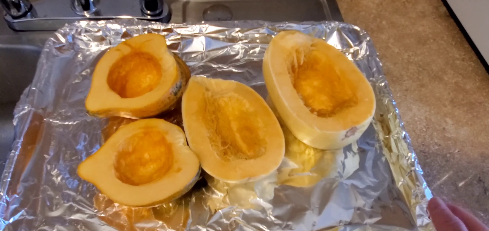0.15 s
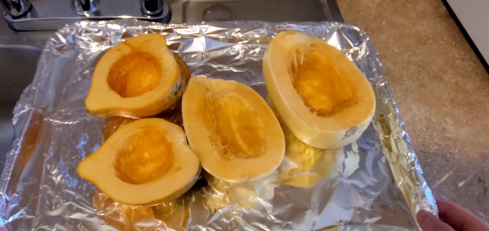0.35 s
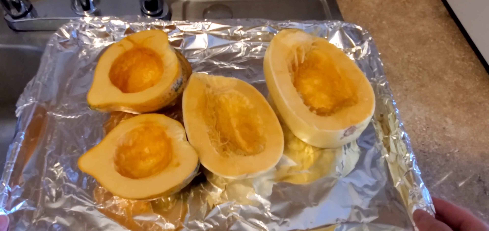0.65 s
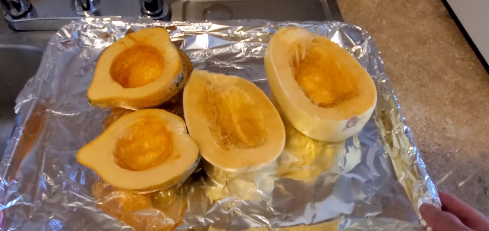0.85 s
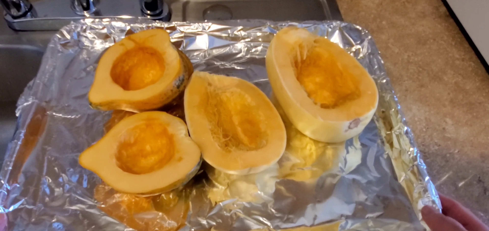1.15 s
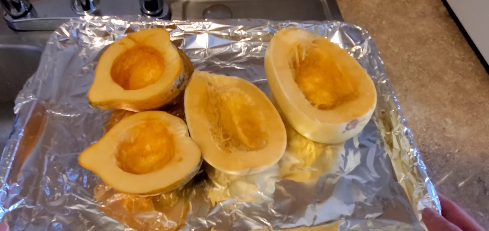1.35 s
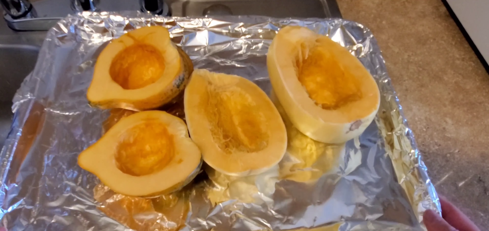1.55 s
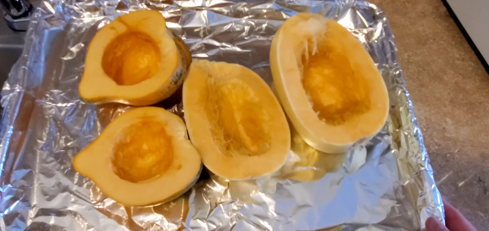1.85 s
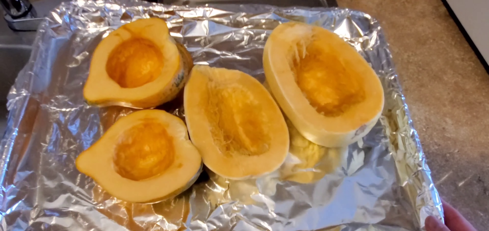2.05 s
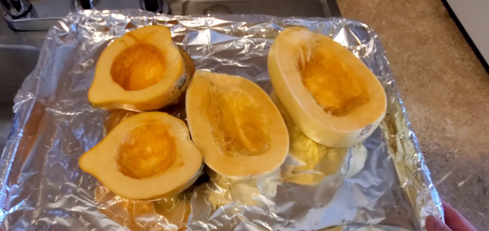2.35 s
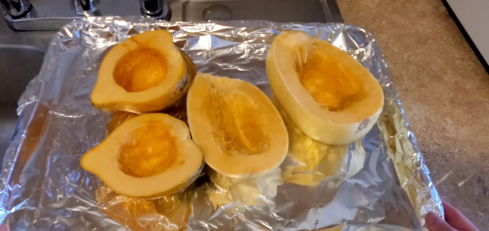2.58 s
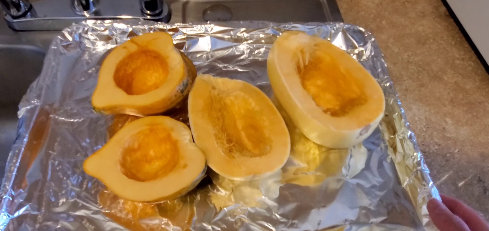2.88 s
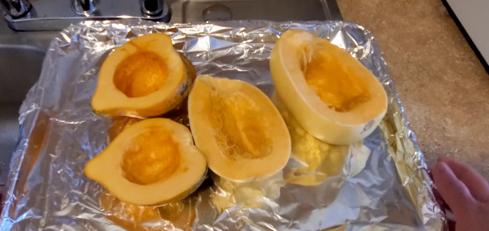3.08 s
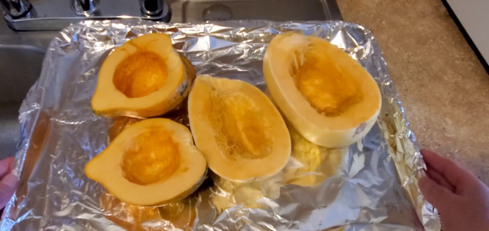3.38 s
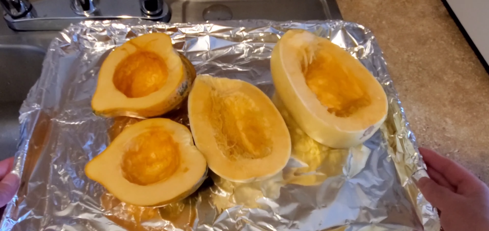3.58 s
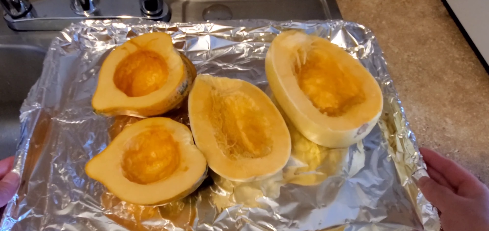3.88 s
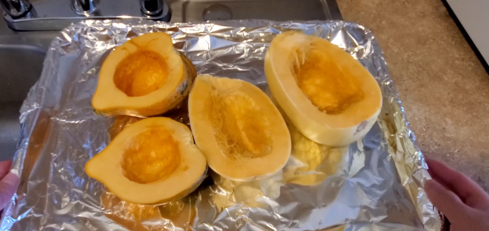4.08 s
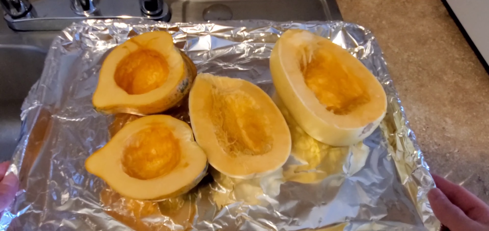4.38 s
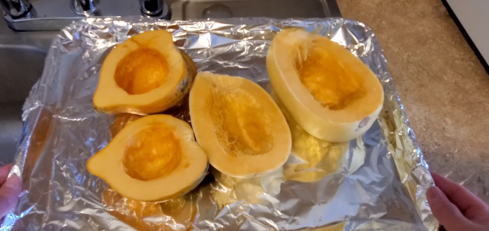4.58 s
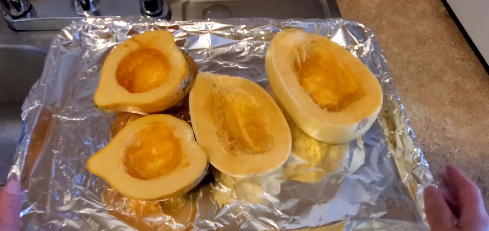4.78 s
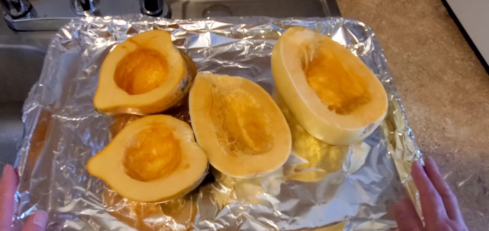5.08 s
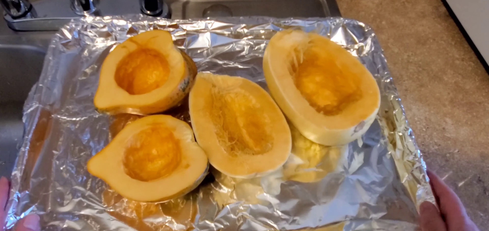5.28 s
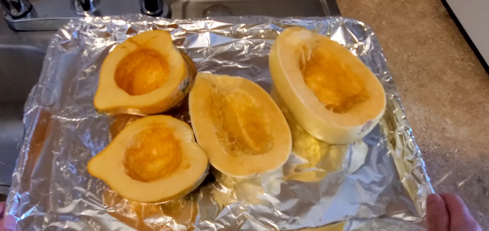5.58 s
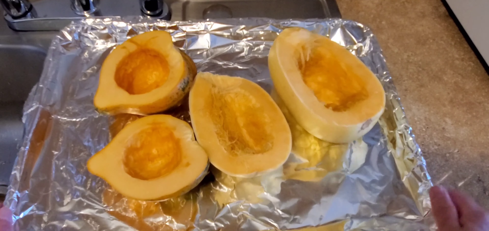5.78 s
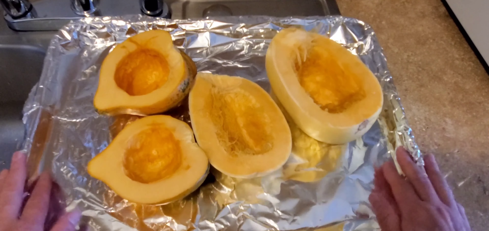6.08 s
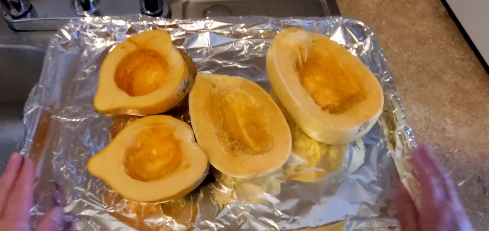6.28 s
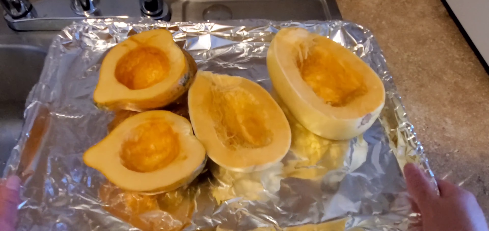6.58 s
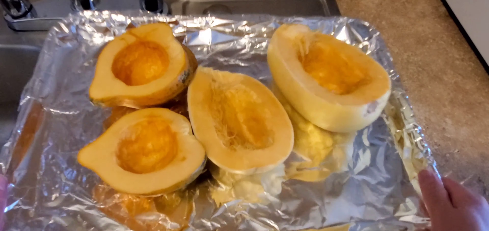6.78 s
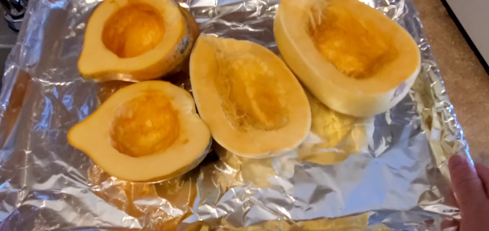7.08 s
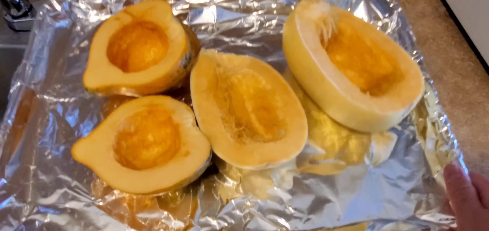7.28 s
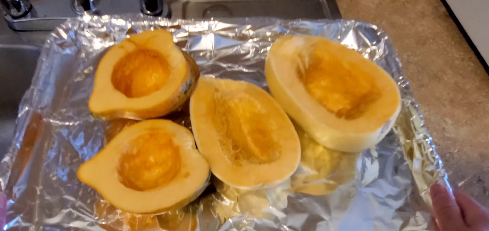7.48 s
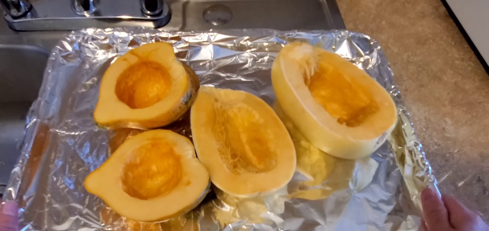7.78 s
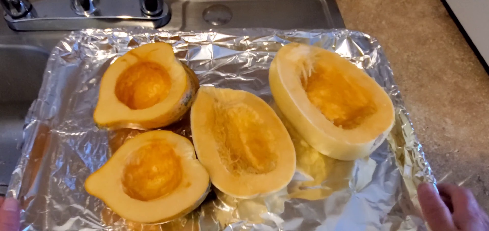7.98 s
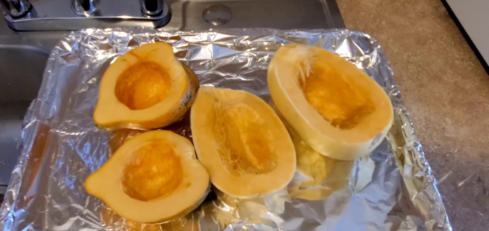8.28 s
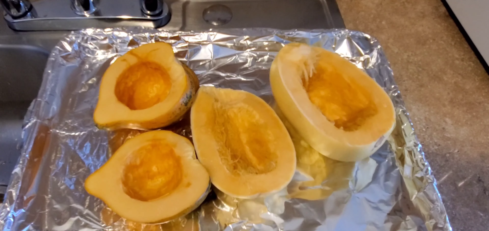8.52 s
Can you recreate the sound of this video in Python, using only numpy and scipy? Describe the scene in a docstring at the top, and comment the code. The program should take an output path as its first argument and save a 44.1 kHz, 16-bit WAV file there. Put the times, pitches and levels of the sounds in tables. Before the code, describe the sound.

Close stereo sound of foil being pressed onto a tray rim: sharp little snaps, dry crinkles and faint patter, shifting slightly between left and right. Low finger rumbles and soft thuds lie beneath. After a dense burst around 6 seconds the tray judders along the counter and knocks. A faint thin whine and tiny squeak close it, with low kitchen hum throughout.

```python
"""Two hands pinch aluminium foil around the rim of a baking tray of squash halves, in a small kitchen.
An appliance hums throughout as filtered noise; sliding fingers rumble low resonances of the tray.
Rustle is a patter of tiny snaps; each pinch is a dying avalanche of snaps, coloured by ringing facets.
The tray knocks the counter now and again as decaying modes and noise; a few facets ping; the tray drags.
Near the end a thin sine whine swells and a soft squeak of narrow noise glides."""
import sys
import numpy as np
from scipy import signal
from scipy.fft import rfft, irfft
from scipy.io import wavfile
from scipy.ndimage import uniform_filter1d

SR = 44100
rng = np.random.default_rng(int(sys.argv[2]) if len(sys.argv) > 2 else 0)


def int16_out(signal):
    """Quantize to a 16-bit WAV file."""
    q = np.round(np.clip(np.atleast_2d(signal).T, -1, 1) * 32767)
    wavfile.write(sys.argv[1], SR, q.astype(np.int16))


N = 381465
TIME = np.arange(N) / SR


def from_db(db):
    """Decibels to amplitude gain."""
    return 10 ** (np.asarray(db) / 20)


def rms_one(x):
    """Scale to unit power."""
    return x / np.sqrt(np.mean(x ** 2) + 1e-20)


def in_time(rows):
    """Interpolate each column of a time table at every sample."""
    s, *columns = np.transpose(rows)
    return [np.interp(TIME, s, column) for column in columns]


def at_hz(points, hz):
    """Read a table on a log-frequency axis."""
    f, value = np.transpose(points)
    return np.interp(np.log(np.maximum(hz, 1)), np.log(f), value)


def cut(x, hz, kind, order=2):
    """Butterworth filter."""
    sos = signal.butter(order, hz, kind, fs=SR, output="sos")
    return signal.sosfilt(sos, x + 1e-18)


def add(track, s, sound):
    """Mix a sound into a track at time s."""
    at = int(s * SR)
    track[..., at:at + sound.shape[-1]] += sound[..., :N - at]


def coloured(x, spectrum, size=4096):
    """Causal (minimum-phase) filter with the given spectrum shape and unit power gain."""
    bins_hz = np.arange(size // 2 + 1) * SR / size
    cepstrum = irfft(np.log(from_db(at_hz(spectrum, bins_hz))))
    response = irfft(np.exp(rfft(2 * cepstrum[:size // 2], size)))
    response = response / np.linalg.norm(response)
    return signal.fftconvolve(x, [response], axes=-1)[:, :N]


def stereo_noise(count, alike):
    """Two white noises sharing the fraction alike of their power."""
    shared, *own = rng.standard_normal((3, count))
    return np.sqrt(alike) * shared + np.sqrt(1 - alike) * np.array(own)


def narrow_noise(hz, width_hz):
    """A resonance, steady or moving, kept ringing by friction: unit-power noise around hz."""
    re, im = cut(rng.standard_normal((2, N)), width_hz / 2, "low")
    carrier = np.exp(2j * np.pi * np.cumsum(hz * np.ones(N)) / SR)
    return rms_one(np.real((re + 1j * im) * carrier))


def snaps(count, per_s, spread_db):
    """Energies of creases that flip at random moments, most small and a few large."""
    chance, size = rng.random((2, count))
    amplitude = from_db(-spread_db * np.log(np.maximum(size, .02)))
    return (chance < per_s / SR) * amplitude ** 2


def ring_down(energy, t60):
    """Stored energy leaks away exponentially, by 60 dB in t60 seconds."""
    keep = from_db(-120 / (t60 * SR))  # energy, so twice 60 dB on the amplitude scale
    return signal.lfilter([1 - keep], [1, -keep], energy + 1e-18)


def gestures(rows, attack_s, t60):
    """Gain of a run of hand movements: each swells up to its start, holds for its length and dies away."""
    power = 0
    for s, length_s, level_db in rows:
        swell = np.exp(np.minimum(TIME - s, 0) / (attack_s / 2))
        release_db = -60 * np.clip((TIME - s - length_s) / t60, 0, 2)
        power = power + (swell * from_db(level_db + release_db)) ** 2
    return np.sqrt(power)


# Hand at work. Each row: start in seconds, hand (0 left, 1 right).
HAND_TURNS = [(0, 0), (.48, 1), (1, 0), (4.97, 1), (8, 0)]


def hand_at(s):
    """The hand at work at time s."""
    start_s, hand = np.transpose(HAND_TURNS)
    return hand[np.searchsorted(start_s, s, side="right") - 1].astype(int)


# Place of each hand. Each row: left-over-right level in dB, lag of the left microphone in seconds.
HAND_PLACES = [(6.0, -.00026), (2.8, .00012)]


def placed(energy, hand, alike):
    """The foil's countless modes ring as noise under an energy envelope; level and lag place the hand."""
    pan_db, lag_s = HAND_PLACES[hand]
    pair = np.sqrt(np.maximum(energy, 0)) * stereo_noise(len(energy), alike)
    pair = pair * from_db([[pan_db / 2], [-pan_db / 2]])
    delays = max(round(lag_s * SR), 0), max(round(-lag_s * SR), 0)
    return np.array([np.pad(side, (delay, 0))[:len(energy)] for side, delay in zip(pair, delays)])


# Appliance noise spectrum. Each row: frequency in Hz, relative density in dB per Hz.
HUM_SPECTRUM = [(20, -13.5), (40, -2), (70, 6), (130, -2.5), (220, -3), (320, 0.5), (440, -7), (560, -7.5),
                (900, -14.5), (2000, -22.5), (5000, -43), (16000, -39)]
# Appliance lines. Each row: frequency in Hz, RMS level in dB.
HUM_LINE_LEVELS = [(80, -66), (440, -66)]


def hum(level_db=-54.5, diffuse_hz=500):
    """Appliance rumble, alike on both sides in the bass and diffuse above, with two wavering lines."""
    bass = cut(stereo_noise(N, alike=0.96), diffuse_hz, "low", order=1)
    diffuse = cut(stereo_noise(N, alike=0.04), diffuse_hz, "high", order=1)
    lines = sum(from_db(db) * narrow_noise(hz, width_hz=6.0) for hz, db in HUM_LINE_LEVELS)
    return from_db(level_db) * coloured(bass + diffuse, HUM_SPECTRUM) + lines


# Hands shifting grip on the tray. Each row: start in seconds, length in seconds, level in dB.
GRIP_SHIFTS = [(0, 0.096, -52.5), (2.95, 0.085, -43), (4.99, .18, -47.5), (6.11, 0.36, -41),
               (8.08, .55, -54)]


def grip():
    """Sliding fingers keep two low resonances of the tray rumbling."""
    low = narrow_noise(84, width_hz=33.0)
    high = from_db(-14.0) * narrow_noise(165, width_hz=23)
    return gestures(GRIP_SHIFTS, attack_s=.04, t60=0.4) * (low + high)


# Fingers pressing the foil down. Each row: start in seconds, length in seconds, relative level in dB.
FINGER_PRESSES = [(.18, 0.071, -45.5), (.3, 0.081, -49), (.45, .02, -41), (.72, 0.013, -49),
                  (.885, 0.032, -45), (1.025, 0.014, -46.5), (1.14, 0.061, -36.5), (1.33, 0.074, -59),
                  (1.785, 0.01, -45), (1.9, 0.13, -60.5), (2.7, .33, -55), (3.08, 0.013, -31),
                  (3.29, 0.059, -57), (3.35, .26, -52), (3.96, .05, -55), (4.015, 0.092, -48),
                  (4.275, 0.062, -45), (4.51, .04, -52), (4.685, 0.028, -41), (4.925, .06, -50),
                  (5.2, 0.35, -51.5), (5.445, 0.087, -49.5), (5.515, 0.097, -36.5), (5.755, 0.065, -47),
                  (6.1, 0.049, -37.5), (6.19, 0.45, -45), (6.44, 0.22, -45.5), (6.87, 0.096, -51),
                  (7.06, 0.064, -49), (7.415, 0.071, -51), (7.66, 0.023, -43.5), (7.805, 0.18, -45.5)]
# Hands resting on the foil, faintly stirring it. Each row: start in seconds, length in seconds,
# relative level in dB.
RESTING_HANDS = [(0.131, 1.32, -58), (2.71, 1.2, -71.5), (4.555, 0.61, -64), (6.098, 3, -70.5)]


def rustle(level_db=-4.0, sparkle_db=-1.0, firm_db=-48.5, brightening_db_per_db=0.1,
           split_hz=6000, rim_hz=2900):
    """Fingers keep up a patter of tiny snaps, brighter the harder they press."""
    fingers = gestures(FINGER_PRESSES + RESTING_HANDS, attack_s=0.029, t60=0.16)
    press_db = 20 * np.log10(np.hypot(fingers, settling()))
    energy = ring_down(snaps(N, per_s=700, spread_db=3.7), t60=.009)
    working = hand_at(TIME)
    both_hands = sum(placed(energy * (working == hand), hand, alike=0.17) for hand in range(2))
    patter = rms_one(both_hands) * from_db(press_db + level_db)
    # the fold over the rim favours one pitch
    patter = patter + 0.54 * signal.lfilter(*signal.iirpeak(rim_hz, 4, fs=SR), patter)
    dull = cut(patter, split_hz, "low", order=3)
    bright = cut(patter, split_hz, "high", order=3)
    return dull + bright * from_db(sparkle_db + brightening_db_per_db * (press_db - firm_db))


# Foil crinkles. Each row: start in seconds, relative peak in dB, body gain in dB, sparkle gain in dB,
# length of the burst in seconds.
FOIL_CRINKLES = [(0.261, -29.5, 6.5, 2, 0.0027), (.4225, -23, -1, 1, 0.009), (.502, -30, 7.5, 3, .012),
                 (.541, -28.5, -3, 4.5, .007), (0.757, -31, 1, 3, 0.013), (.778, -25.5, 0.5, -10, 0.006),
                 (.909, -34, -15, 8, 0.0045), (.967, -51, -3, 13, 0.0065), (1.117, -25.5, -6, 0.5, 0.0043),
                 (1.277, -31.5, 1, 5, 0.0092), (1.358, -32.5, -3, -19, 0.0035),
                 (1.557, -23.5, -4, 7.5, 0.0091), (1.664, -40, -3, -2, 0.0096), (1.914, -33.5, 2, 6, .011),
                 (2.504, -36, 11.5, -2, 0.018), (2.729, -31.5, -5, -6, 0.0059), (2.75, -20.5, 7, 0, 0.0069),
                 (2.829, -28.5, 6, 4, 0.0094), (2.937, -36, 7.5, 12, 0.0077), (2.986, -36, 9, 2, 0.012),
                 (3.0637, -22.5, 2.5, -7, 0.014), (3.084, -16.5, -2, -2, 0.0071),
                 (3.351, -31.5, 5.5, -10, 0.004), (3.468, -38, 5, -1, 0.0072),
                 (3.555, -33, 2.5, 6.5, 0.0054), (3.75, -42, 6, 4, 0.0087), (4.079, -26.5, 0, 5, 0.0028),
                 (4.227, -36, -9, -3.5, 0.013), (4.26, -35.5, -9, 5, 0.011), (4.288, -34.5, 6.5, 0, 0.015),
                 (4.343, -34.5, 7, 3, 0.011), (4.554, -30.5, -1, -1, 0.0074), (4.74, -20, 5.5, .5, 0.0072),
                 (4.956, -24.5, -1, -0.5, 0.0094), (4.981, -19.5, 3, -2, .007), (5.179, -37, 5, -2, 0.0055),
                 (5.34, -28, -1, -10, 0.011), (5.521, -27.5, -20, 3.5, 0.026), (5.594, -34, -19, 6, 0.0078),
                 (5.718, -35.5, -4, 5, 0.015), (6.074, -14, 4.5, 0, 0.018), (6.096, -14.5, -10, 4, .012),
                 (6.267, -20, 1.5, 1, 0.0069), (6.425, -27, 9, 2.5, 0.026), (6.452, -24.5, 2.5, 1.5, .005),
                 (6.604, -30.5, 5, 11.5, 0.012), (6.711, -29.5, 3.5, 0, 0.0066), (6.745, -30, 1, 8.5, .018),
                 (6.903, -28, -1, 4.5, 0.0092), (7.08, -30.5, 1.5, -0.5, .005),
                 (7.165, -40.5, 0, -10.5, 0.0064), (7.485, -24, 1.5, 3, 0.0077),
                 (7.644, -29.5, 14, -8, 0.0076), (7.787, -30, -9, 5.5, 0.011), (7.837, -30, 0.5, -7, .007),
                 (7.889, -24, 8.5, -1, 0.0084), (7.954, -26, 6.5, -0.5, 0.0072),
                 (8.006, -39.5, -10, 12, 0.0041), (8.079, -22, 5, -10, 0.0087)]


def settling(under_peak_db=-20.5):
    """Gain of the small creases that go on flipping after each crinkle."""
    rows = [(s + length_s, length_s, peak_db + under_peak_db)
            for s, peak_db, _, _, length_s in FOIL_CRINKLES]
    return gestures(rows, attack_s=.004, t60=0.21)


def crinkles(level_db=-8.5, body_hz=1900, sparkle_hz=7000, first_snap=0.4):
    """One crease sets off a dying avalanche of others; large facets add body, small ones sparkle."""
    body, middle, sparkle = np.zeros((3, 2, N))
    t = np.arange(SR // 6) / SR
    for s, peak_db, body_db, sparkle_db, length_s in FOIL_CRINKLES:
        avalanche = snaps(len(t), per_s=2500, spread_db=4.0) * np.exp(-2 * t / length_s)
        avalanche[0] = first_snap
        energy = ring_down(avalanche, t60=0.047)
        energy = energy / uniform_filter1d(energy, size=350).max()  # loudest 8 ms at unit power
        burst = placed(energy, hand_at(s), alike=0.31) * from_db(peak_db + level_db)
        add(body, s, burst * from_db(body_db))
        add(middle, s, burst)
        add(sparkle, s, burst * from_db(sparkle_db))
    body = cut(body, body_hz, "low", order=3)
    middle = cut(cut(middle, body_hz, "high", order=3), sparkle_hz, "low", order=3)
    return body + middle + cut(sparkle, sparkle_hz, "high", order=3)


def facets(x, count=32):
    """Flat facets between the creases ring briefly; how taut each one is drifts at random."""
    out, moments_s = 0, np.arange(0, N / SR + .1, .07)
    for hz in np.geomspace(1200, 12000, count) * rng.uniform(.98, 1.02, count):
        taut = rng.standard_normal(len(moments_s))
        coupling = np.interp(TIME, moments_s, taut * np.minimum(np.abs(taut), 1.3))
        width_hz = 35 + hz / 100
        resonator = signal.iirpeak(hz, hz / width_hz, fs=SR)
        out = out + signal.lfilter(*resonator, x * coupling + 1e-18)
    return out


# Modes of the loaded tray. Each row: frequency in Hz, relative level in dB, t60 in seconds.
TRAY_MODES = [(80, -5, 0.17), (89.3, 0, 0.25), (115, -6, 0.058), (157.6, 1, 0.11), (172, 1.5, 0.23),
              (222.4, -9.5, 0.21), (250, -16, 0.22), (286.4, -8, 0.19), (328.7, -5, 0.16),
              (450.5, -8.5, 0.091), (568, -9, 0.098), (643, -23, 0.2), (780, -23.5, .11), (890, -16, 0.12),
              (858, -17.5, 0.13), (1078, -21, 0.076), (1364, -9.5, 0.14), (1453, -12, .1),
              (1850, -22.5, 0.088)]
# Tray on counter. Each row: start in seconds, relative level in dB, contact hardness as a low-pass in Hz,
# gain of the deep modes in dB.
TRAY_KNOCKS = [(.76, -41, 120, 17), (1.065, -36, 101, 10), (2.488, -12.5, 1500, -10.5),
               (2.535, -31, 250, 1), (2.878, -36.5, 151, 15), (2.978, -29.5, 250, 4.5),
               (3.34, -24.5, 146, 11.5), (4.735, -45, 407, -3), (4.966, -33.5, 204, 3),
               (5.152, -41, 150, -1), (5.379, -34.5, 130, 8), (5.553, -41.5, 150, 2.5),
               (6.097, -24, 250, 6.5), (6.2, -34, 130, -11), (6.272, -30, 193, 7), (6.349, -39, 152, -13),
               (6.433, -27.5, 500, 15), (6.457, -31, 198, 0.5), (7.495, -39, 400, 1),
               (7.65, -16, 1230, 7.5)]


def knocks(level_db=-8.0, clack_db=4.5, clack_t60=0.11, clack_hz=2000, thud_db=0.5, thud_t60=0.22,
           bloom_s_at_170_hz=0.0052, uneven_db=1.9, lowest_hz=40):
    """The tray bumps the counter: soft contacts wake only low modes; the squash settles with a thud."""
    out, t = np.zeros(N), np.arange(SR // 2) / SR
    hz, mode_db, t60 = np.transpose(TRAY_MODES)[:, :, None]
    swell = 1 - np.exp(-t * (hz / 170) / bloom_s_at_170_hz)
    deep = hz < 130
    for s, knock_db, hardness_hz, thump_db in TRAY_KNOCKS:
        strength, detune, phase = rng.standard_normal((3, len(TRAY_MODES), 1))
        gain = from_db(mode_db + thump_db * deep + uneven_db * strength - 60 * t / t60) * swell
        modes = gain * np.sin(2 * np.pi * hz * (1 + 0.007 * detune) * t + np.pi * phase)
        clack = cut(rng.standard_normal(len(t)), [400, clack_hz], "band")
        clack = clack * from_db(clack_db - 60 * t / clack_t60)
        thud = cut(rng.standard_normal(len(t)), [70, 320], "band")
        thud = thud * from_db(thud_db - 60 * t / thud_t60)
        blow = cut(modes.sum(axis=0) + clack + thud, hardness_hz, "low")
        blow = cut(blow, lowest_hz, "high")
        blow = blow / np.std(blow[:SR // 25])  # first 40 ms at unit power
        add(out, s, blow * from_db(knock_db + level_db))
    # the middle modes radiate to the left
    middle = 0.2 * cut(out, [240, 420], "band", order=1)
    return out * from_db([[.5], [-.5]]) + middle * [[1], [-1]]


# Taut facets that sing on. Each row: start in seconds, frequency in Hz, peak in dB.
FACET_PINGS = [(4.003, 2950, -46), (4.08, 5350, -40), (8.083, 1240, -40)]


def pings(t60=0.15):
    """Taut facets sing on as pure tones that die exponentially."""
    out, t = np.zeros(N), np.arange(SR // 2) / SR
    for s, hz, peak_db in FACET_PINGS:
        add(out, s, from_db(peak_db - 60 * t / t60) * np.sin(2 * np.pi * hz * t))
    return out


# Shoves along the counter. Each row: start in seconds, length in seconds, relative level in dB.
TRAY_SHOVES = [(6.93, 0.015, -38), (7.06, 0.067, -39), (7.17, 0.079, -52)]
# Resonances of the sliding tray. Each row: frequency in Hz, width in Hz, relative level in dB.
JUDDER_MODES = [(167, 7.5, -0.5), (275, 110, -23), (630, 32, -11.5), (835, 34, -23), (980, 60, -23)]


def drag():
    """The tray judders in a few resonances as it slides."""
    judder = sum(from_db(db) * narrow_noise(hz, width_hz) for hz, width_hz, db in JUDDER_MODES)
    return gestures(TRAY_SHOVES, attack_s=0.044, t60=0.11) * judder


def whine(hz=1178, start_s=8.13, swell_s=.28, rms_db=-68.5):
    """A thin steady sine that swells linearly and stays."""
    swell = np.clip((TIME - start_s) / swell_s, 0, 1)
    return from_db(rms_db) * swell * np.sqrt(2) * np.sin(2 * np.pi * hz * TIME)


# Soft squeak. Each row: time in seconds, frequency in Hz, level in dB.
SQUEAK_GLIDE = [(8.39, 3200, -85), (8.44, 3390, -68), (8.48, 3800, -65), (8.515, 3170, -65),
                (8.565, 3170, -63), (8.65, 3170, -81)]


def squeak():
    """Friction keeps a gliding resonance ringing; the end rows hold outside the glide."""
    hz, level_db = in_time(SQUEAK_GLIDE)
    return from_db(level_db) * narrow_noise(hz, width_hz=400)


# Kitchen decay. Each row: frequency in Hz, t60 in seconds.
ROOM_T60 = [(100, 0.28), (500, 0.25), (1400, 0.28), (3500, 0.11), (9000, 0.089), (16000, 0.085)]


def kitchen(x, alike_hz=350):
    """Reflections merge into a diffuse field storing each band's energy; treble dies first, bass is alike."""
    out, edges_hz = 0, np.geomspace(70, 19000, 8)
    for band in zip(edges_hz, edges_hz[1:]):
        hz = np.sqrt(band[0] * band[1])
        energy = np.mean(cut(x, band, "band") ** 2, axis=0)
        stored = ring_down(energy, at_hz(ROOM_T60, hz))
        noise = stereo_noise(N, alike=1 / (1 + (hz / alike_hz) ** 2))
        out = out + np.sqrt(stored) * rms_one(cut(noise, band, "band"))
    return out


# Foil colour. Each row: frequency in Hz, relative gain in dB.
FOIL_SPECTRUM = [(100, -14), (400, -8), (800, -14.5), (1250, -0.5), (1900, -2.5), (2900, 5), (4500, 4.5),
                 (7000, -2), (11000, -6)]


def scene(facet_db=2.0, foil_room_db=-2.0, tray_room_db=-11.5):
    """Foil and tray close by, the kitchen around them."""
    foil = crinkles() + rustle()
    foil = coloured(foil + from_db(facet_db) * facets(foil), FOIL_SPECTRUM)
    tray = knocks() + drag() + grip()
    room = kitchen(from_db(foil_room_db) * foil + from_db(tray_room_db) * tray)
    return foil + pings() + tray + room + hum() + whine() + squeak()


def record(dry, cutoff_hz=16000):
    """The top is cut steeply by an elliptic low-pass."""
    return signal.sosfilt(signal.ellip(12, .1, 80, cutoff_hz, fs=SR, output="sos"), dry)


dry = scene()
out = record(dry)
int16_out(out)
```